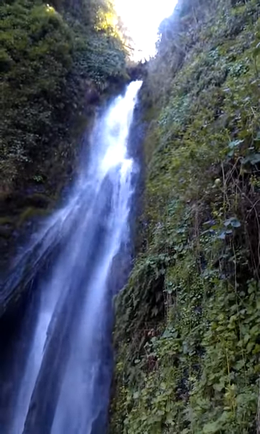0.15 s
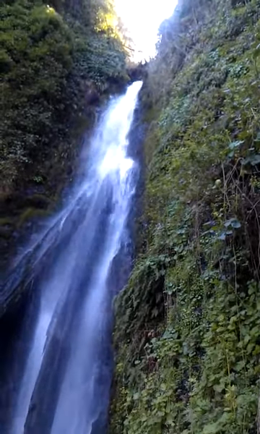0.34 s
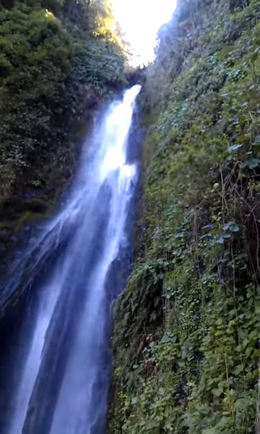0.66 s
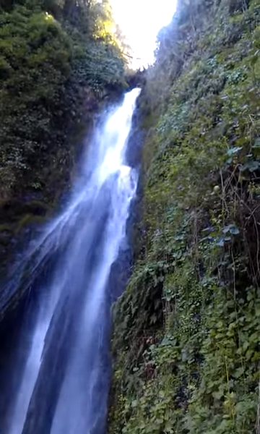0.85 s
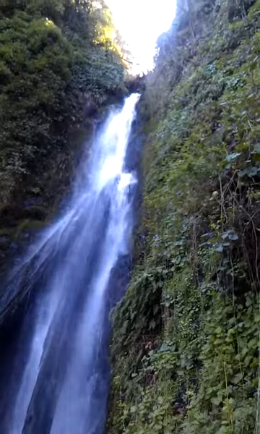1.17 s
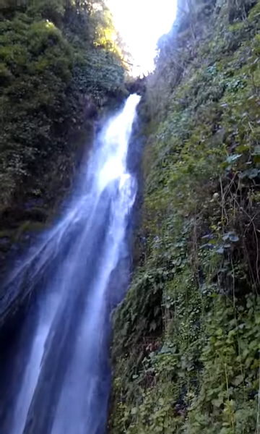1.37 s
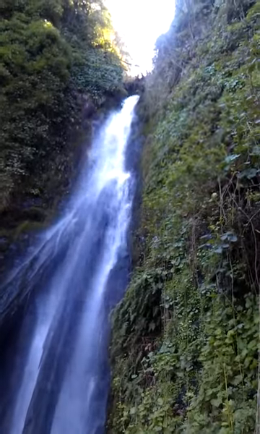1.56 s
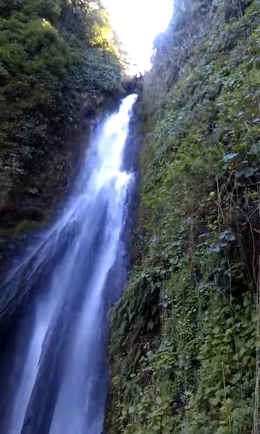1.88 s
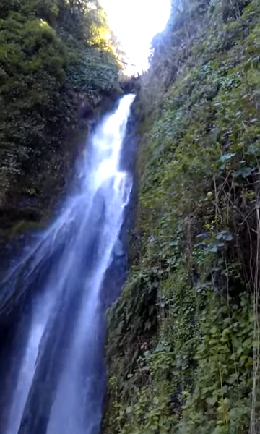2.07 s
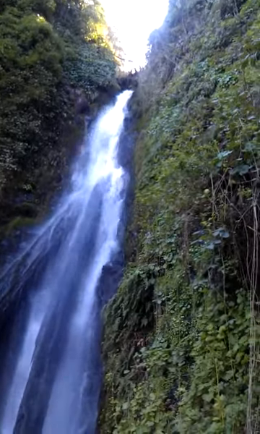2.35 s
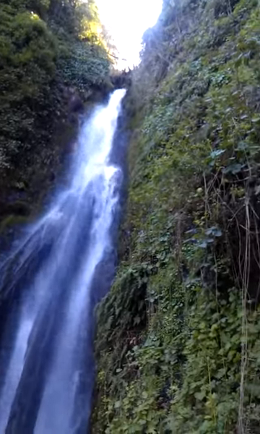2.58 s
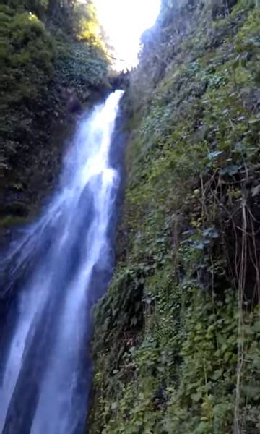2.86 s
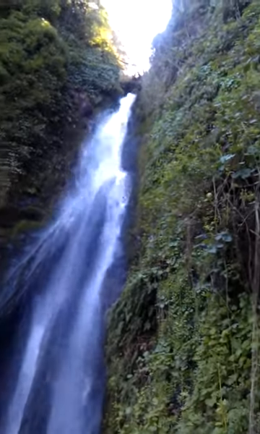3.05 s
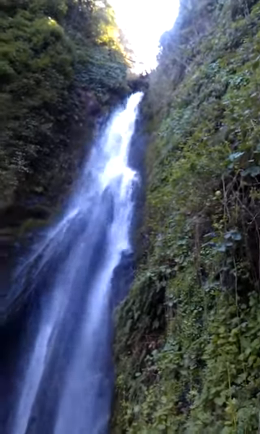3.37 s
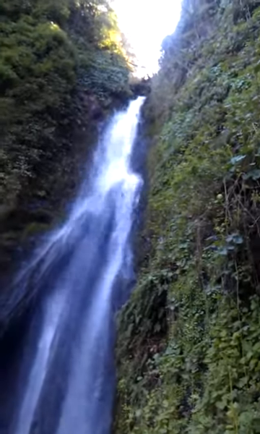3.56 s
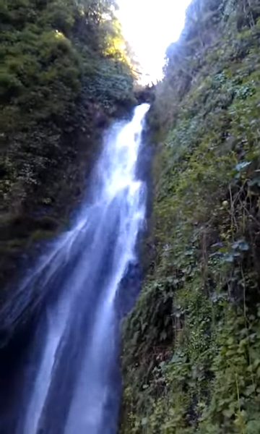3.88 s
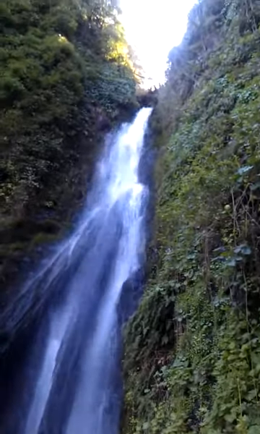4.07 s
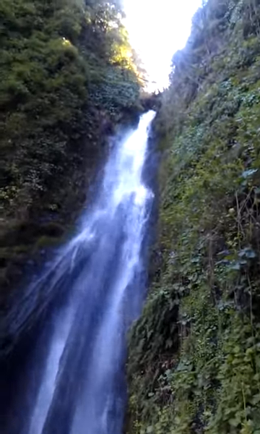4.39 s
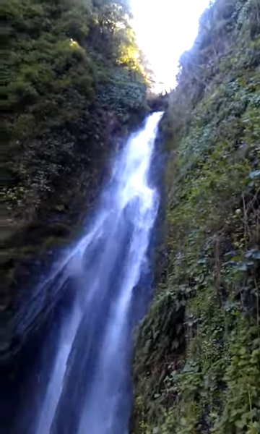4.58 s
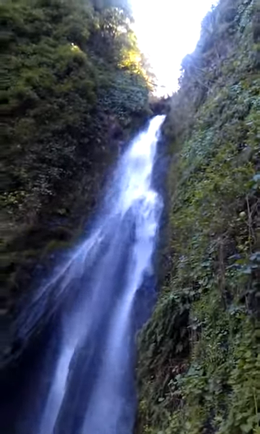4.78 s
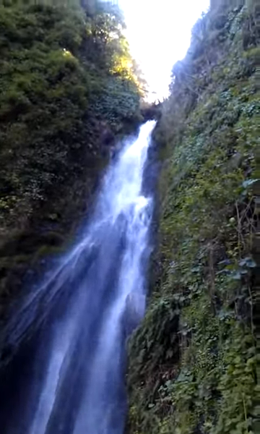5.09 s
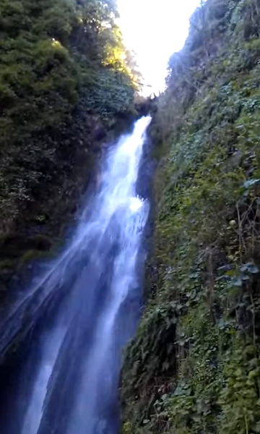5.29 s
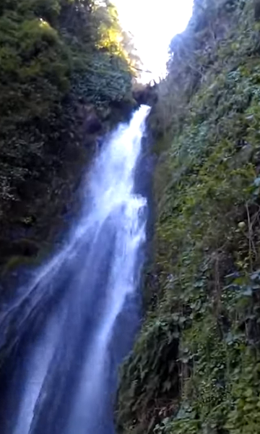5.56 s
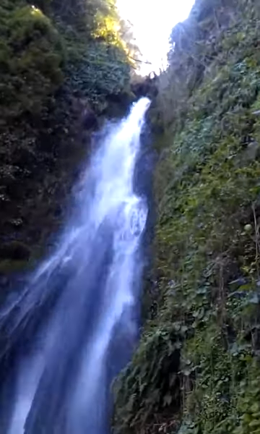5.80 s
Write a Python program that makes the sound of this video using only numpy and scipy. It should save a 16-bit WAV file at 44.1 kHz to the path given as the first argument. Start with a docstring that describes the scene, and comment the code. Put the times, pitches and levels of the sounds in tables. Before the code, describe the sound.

From the very start a tall waterfall rushes down a cliff outdoors. Countless splashes on rock merge into one even, unbroken noise, with a fine hiss of spray on top and a softer low roar beneath. The level barely wavers, and no single drops stand out. For the first two seconds the sound has a slightly hollow, nasal ring, as though heard through a hand cupped around the microphone. At about 2 seconds the tone begins to open, and a subtle sweep slides downward through the hiss. A second opening follows at around 3 to 3.4 seconds, and by roughly 3.7 seconds the nasal colour and the sweep are gone. The spray now sounds brighter and more natural, and the waterfall keeps rushing steadily to the end.

```python
"""Waterfall through a cupped hand

A tall waterfall rushes down a cliff: countless splashes superpose into an even, unbroken roar and hiss.
The sound reaches one microphone through a cupped hand, whose cavity resonances give it a nasal ring.
From about two seconds on the hand opens: an interference notch slides down and the spray turns bright."""
import sys
import numpy as np
from scipy import signal
from scipy.io import wavfile
from scipy.ndimage import uniform_filter1d

SR = 44100
rng = np.random.default_rng(int(sys.argv[2]) if len(sys.argv) > 2 else 0)


def bounce(signal):
    """Save signal as a 16-bit WAV file at the path given by the first command-line argument."""
    frames = np.transpose(np.atleast_2d(signal))
    limited = np.clip(frames, -1, 1)
    pcm = np.round(limited * 32767).astype(np.int16)
    wavfile.write(sys.argv[1], SR, pcm)


N = 261513
FRAME, HOP = 2048, 512  # samples
HZ = np.fft.rfftfreq(FRAME, 1 / SR)
TIMES = np.arange(N // HOP + 3) * HOP / SR

# spectrum of the water landing: (frequency [Hz], relative level [dB])
ROAR_SPECTRUM = [(15, -50), (25, -43), (50, -38), (75, -28), (100, -19.5), (150, -6), (200, -5),
                 (300, -2.5), (410, -5), (520, -3), (700, -8.5), (1300, -60)]
# spectrum of the fine drops: (frequency [Hz], relative level [dB])
SPRAY_SPECTRUM = [(2500, -42), (4200, -6), (5100, 0.5), (5900, -0.4), (6600, 0.7), (7700, -1), (8700, -3),
                  (9500, -2.5), (10900, -2.5), (11800, -9.5), (12800, -10), (15400, -12), (15900, -19)]
# spectrum of water breaking on rock: (frequency [Hz], relative level [dB])
SPLASH_SPECTRUM = [(300, -44), (450, -12.5), (640, -1.5), (850, -2), (1130, 0.4), (1380, -1.5), (1560, -2),
                   (1830, -3), (2250, 0), (2700, -1), (3600, -1.5), (4300, -7), (5200, -8.5), (8000, -55)]
# faint low ripple from ground and rock-wall reflection (first three rows), then the cupped hand's
# resonances (+) and notches (-): (frequency [Hz], width [Hz], gain [dB])
RIPPLE_AND_HAND_BANDS = [(650, 150, 0.2), (895, 350, -1), (1290, 270, -0.4), (1860, 570, 4),
                         (2627, 1060, 5.5), (5030, 740, -5.5), (8050, 1300, 1), (10360, 1100, -3),
                         (12400, 1900, 3.5), (14600, 2000, -3.5)]
# resonances of the gap in the half-open hand: (frequency [Hz], width [Hz], gain [dB])
HALF_OPEN_MODES = [(1620, 560, 2), (13000, 1400, 3)]
# the two moves that open the hand: (start [s], duration [s], share of cupping released [0-1])
HAND_OPENINGS = [(2.15, .23, 0.52), (3.05, 0.34, .52)]


def gain_of(db):
    """Amplitude grows tenfold for every 20 dB."""
    return 10 ** (np.asarray(db) / 20)


def unit_rms(x):
    """Normalisation to a mean power of one."""
    return x / np.sqrt(np.mean(x ** 2) + 1e-20)


def envelope_db(spectrum):
    """A spectral envelope, interpolated over log frequency."""
    hz, db = np.transpose(spectrum)
    return np.interp(np.log(HZ + 1), np.log(hz), db)


def bell(hz, width_hz):
    """A Gaussian band of height one, with its full width taken at half height."""
    return .5 ** ((2 * (HZ - hz) / width_hz) ** 2)


def churn(frames, bins):
    """A moving average correlates random values into patches over time and frequency."""
    field = rng.standard_normal((len(TIMES), len(HZ)))
    slow_field = uniform_filter1d(field, frames, axis=0)
    return unit_rms(uniform_filter1d(slow_field, bins, axis=1))


def rush(field_db):
    """Dense splashes add in random phase to Gaussian noise, here shaped by field_db and of rms one."""
    real, imag = rng.standard_normal((2, len(TIMES), len(HZ)))
    spectra = (real + 1j * imag) * gain_of(field_db)
    return unit_rms(signal.istft(spectra.T, nperseg=FRAME, noverlap=FRAME - HOP)[1][:N])


def roar(level_db=-38, patchy_db=1.0, surge_db=0.2):
    """Turbulence: heavy water lands in uneven surges and radiates low noise at the foot of the fall."""
    patches = patchy_db * churn(frames=9, bins=5)
    surges = surge_db * churn(frames=12, bins=60)
    return gain_of(level_db) * rush(envelope_db(ROAR_SPECTRUM) + patches + surges)


def flow_swell(rms_db=.18, slowest_hz=0.336, fastest_hz=2.6):
    """Amplitude modulation: the flow wavers slightly, giving a slow random gain."""
    t = np.arange(N) / SR
    rates = np.geomspace(slowest_hz, fastest_hz, 20)
    waver = sum(np.sin(2 * np.pi * (hz * t + rng.random())) / np.sqrt(hz) for hz in rates)
    return gain_of(rms_db * unit_rms(waver))


def spray(level_db=-24, patchy_db=0.65, clump_db=0.53):
    """Fine bursting drops sum incoherently to a hiss; clumps of them briefly lift wide bands."""
    patches = patchy_db * churn(frames=5, bins=24)
    clumps = clump_db * churn(frames=4, bins=400)
    return gain_of(level_db) * rush(envelope_db(SPRAY_SPECTRUM) + patches + clumps)


def splash(level_db=-23.5, patchy_db=0.56):
    """Bubble resonance: water breaks on rock, and bubble clouds of many pitches merge into noise."""
    patches = patchy_db * churn(frames=7, bins=14)
    return gain_of(level_db) * rush(envelope_db(SPLASH_SPECTRUM) + patches)


def hand_cupping(t):
    """Closure of the cavity, from one (cupped) to zero (open)."""
    released = sum(share * np.clip((t - start) / length, 0, 1) for start, length, share in HAND_OPENINGS)
    return np.clip(1 - released, 0, 1)


def bands_db(bands):
    """Peaks and dips in cascade add in decibels."""
    return sum(db * bell(hz, width) for hz, width, db in bands)


def palm_notch_db(t, cupping, leaves_s=2.01, gone_s=3.74, fade_s=.4, echo_db=3, seal_db=9.5):
    """Destructive interference: as the palm's echo comes later and weaker, its notch sinks and fills."""
    start_hz, sink_hz_per_s, lowest_hz = 6340, 2200, 3000
    notch_hz = np.maximum(start_hz - sink_hz_per_s * np.maximum(t - leaves_s, 0), lowest_hz)
    echo = np.clip((gone_s - t) / fade_s, 0, 1)
    seal = np.maximum(2 * cupping - 1, 0)  # a tight cup deepens the notch
    return (echo_db * echo + seal_db * seal) * bell(notch_hz, width_hz=.21 * notch_hz)


def cupped_hand(x, shade_db=2.1):
    """Cavity resonance weakens as the hand opens; half-open fingers form a gap and shade the treble."""
    _, times, spectra = signal.stft(x, SR, nperseg=FRAME, noverlap=FRAME - HOP)
    t = times[:, None]
    cupping = hand_cupping(t)
    half_open = np.sin(np.pi * cupping)
    # the faint ground and wall ripple fades along with the hand's ring
    colour_db = cupping * bands_db(RIPPLE_AND_HAND_BANDS) + half_open * bands_db(HALF_OPEN_MODES)
    shadow_db = shade_db * half_open * bell(hz=8400, width_hz=6600)
    response = gain_of(colour_db - palm_notch_db(t, cupping) - shadow_db)
    return signal.istft(spectra * response.T, nperseg=FRAME, noverlap=FRAME - HOP)[1][:N]


def scene():
    """Superposition: splash and spray swell over the roar and pass the hand, alike in both channels."""
    waterfall = roar() + flow_swell() * (splash() + spray())
    heard = cupped_hand(waterfall)
    return np.array([heard, heard])


def record(dry, cutoff_hz=15850):
    """Band limiting: a steep low-pass filter removes the highest treble."""
    low_pass = signal.firwin(1023, cutoff_hz, window=("kaiser", 9), fs=SR)
    return signal.oaconvolve(dry, low_pass[None], "same", axes=1)


dry = scene()
out = record(dry)
bounce(out)
```